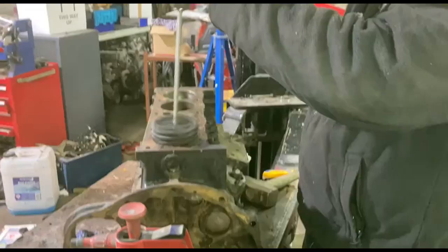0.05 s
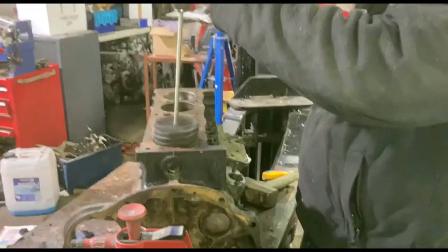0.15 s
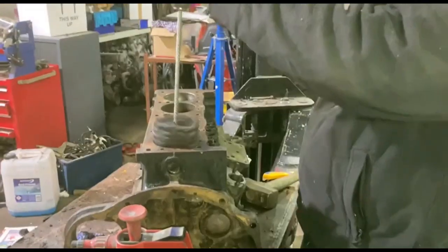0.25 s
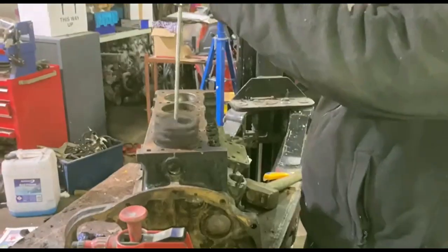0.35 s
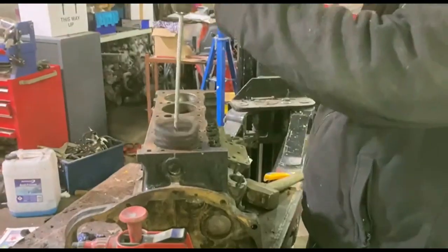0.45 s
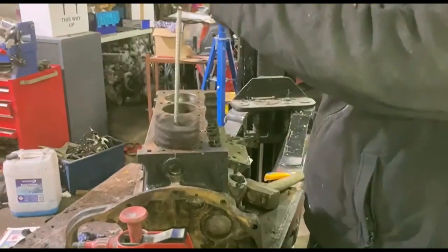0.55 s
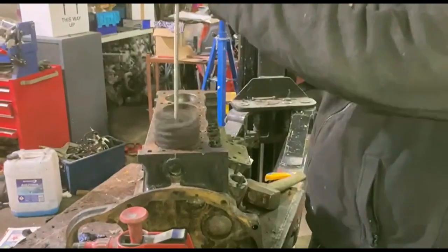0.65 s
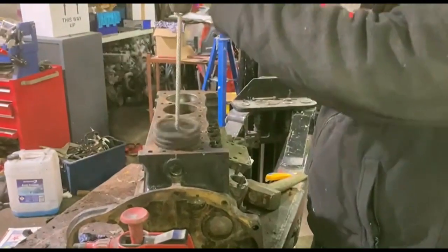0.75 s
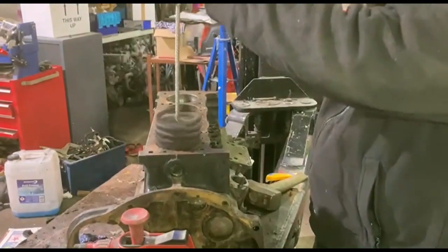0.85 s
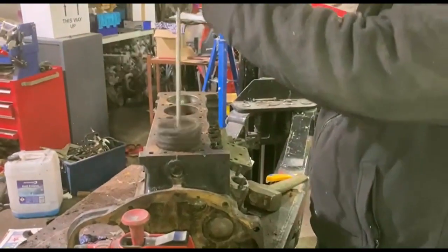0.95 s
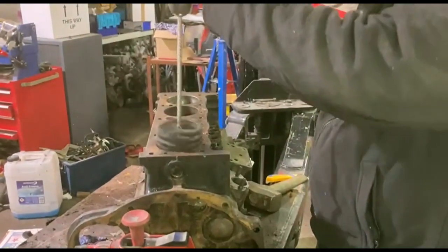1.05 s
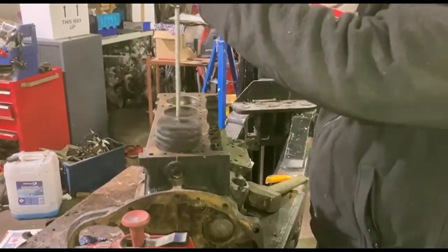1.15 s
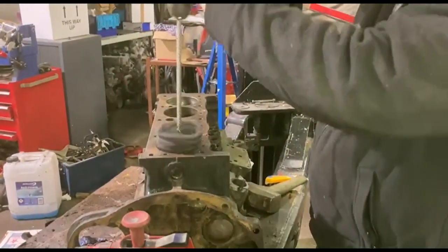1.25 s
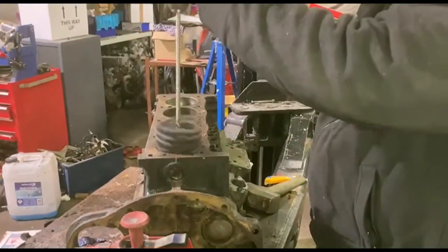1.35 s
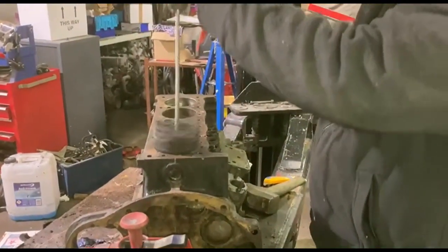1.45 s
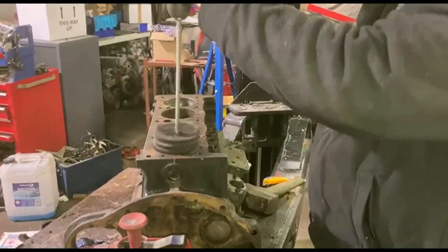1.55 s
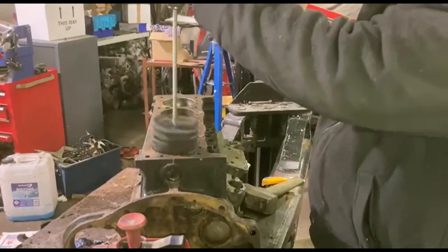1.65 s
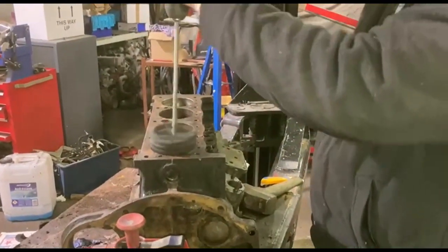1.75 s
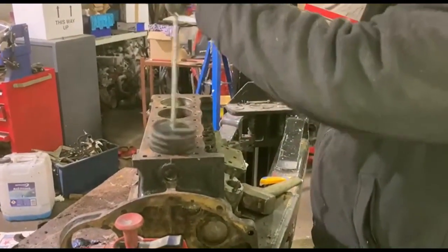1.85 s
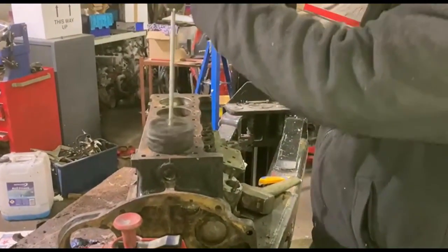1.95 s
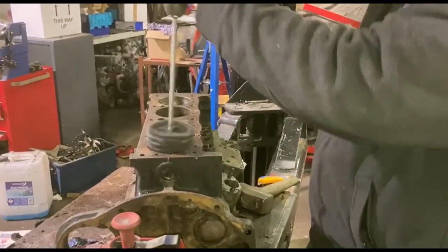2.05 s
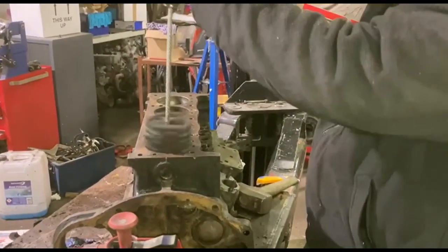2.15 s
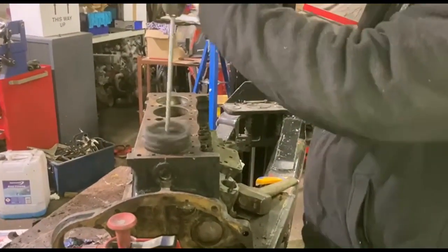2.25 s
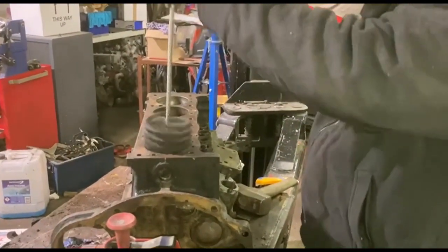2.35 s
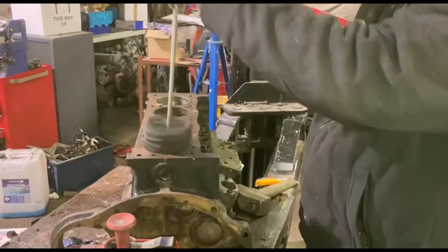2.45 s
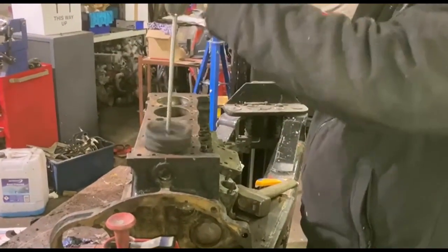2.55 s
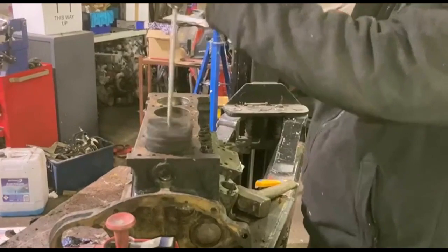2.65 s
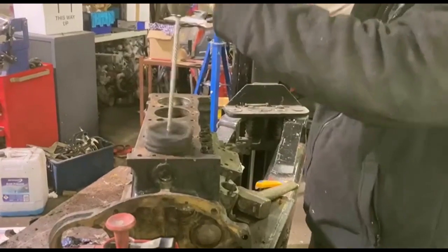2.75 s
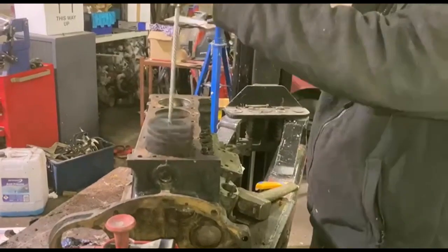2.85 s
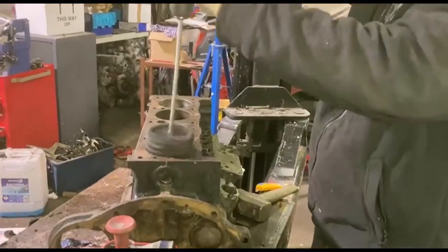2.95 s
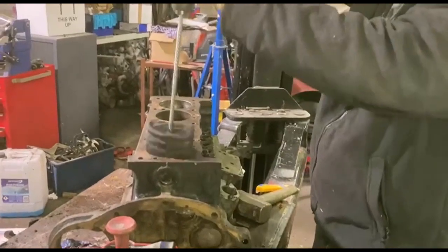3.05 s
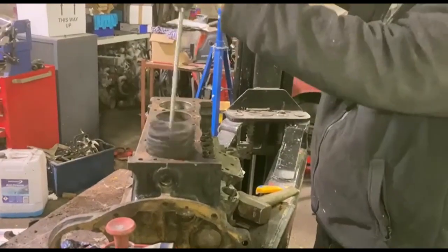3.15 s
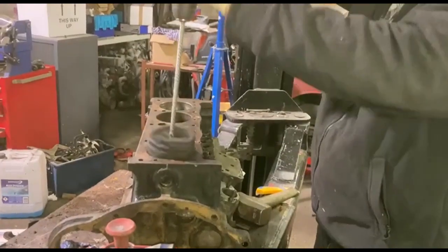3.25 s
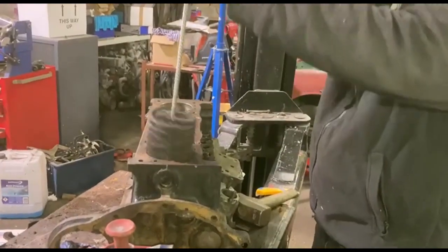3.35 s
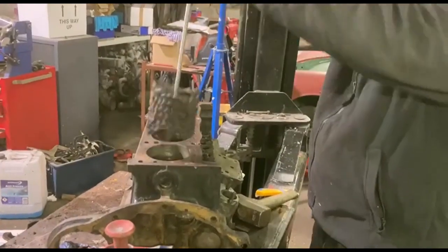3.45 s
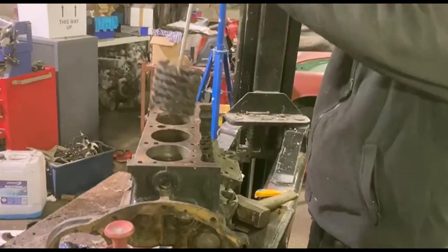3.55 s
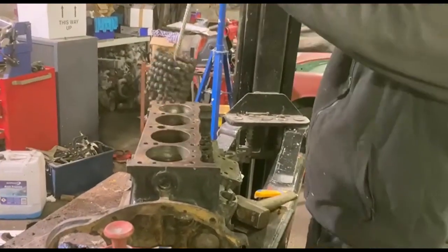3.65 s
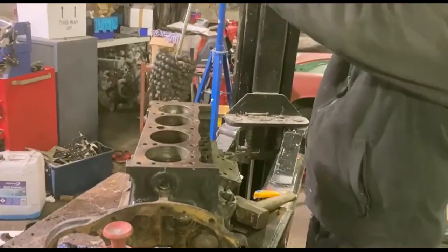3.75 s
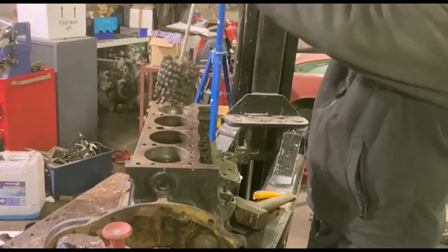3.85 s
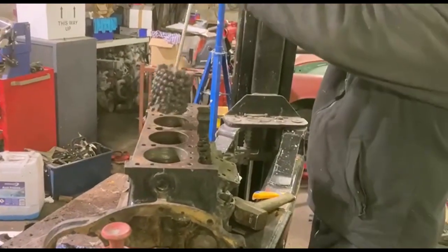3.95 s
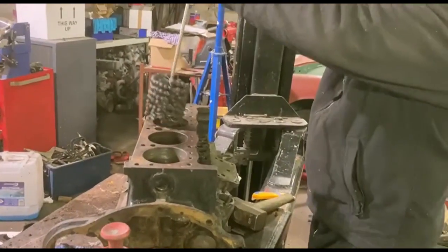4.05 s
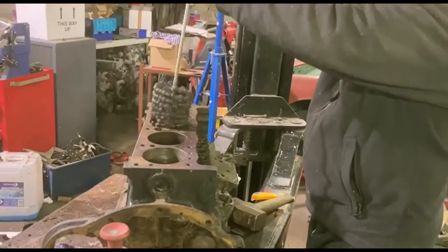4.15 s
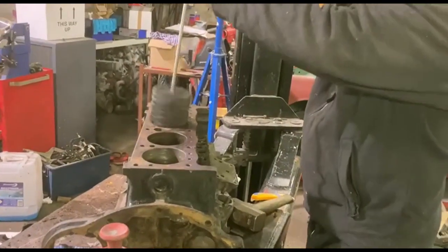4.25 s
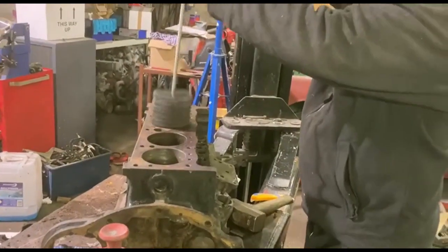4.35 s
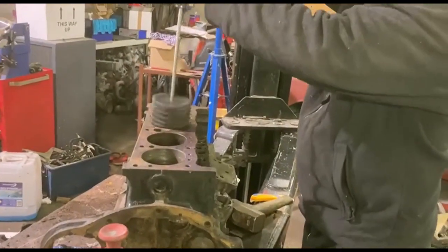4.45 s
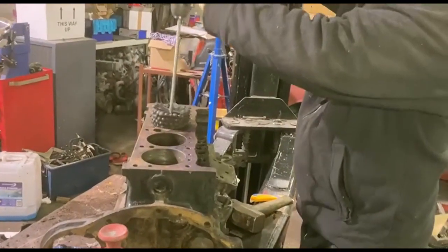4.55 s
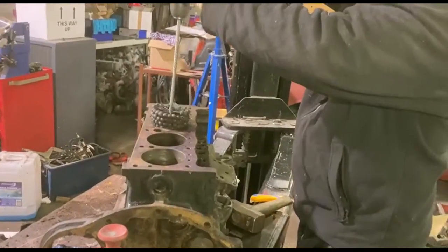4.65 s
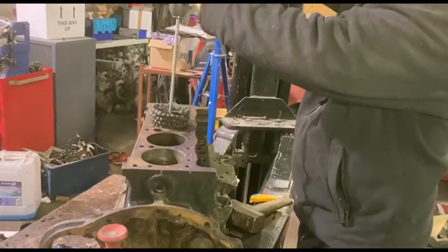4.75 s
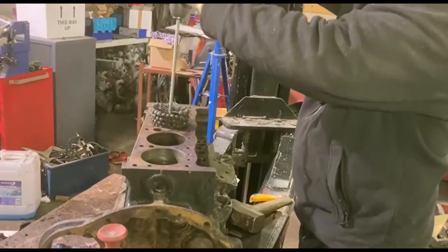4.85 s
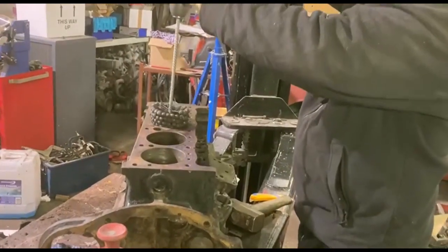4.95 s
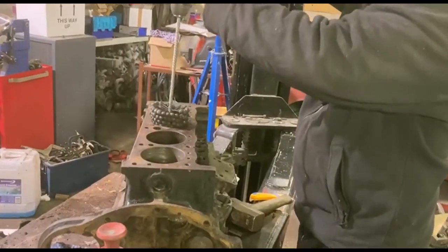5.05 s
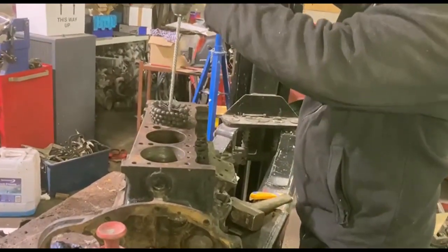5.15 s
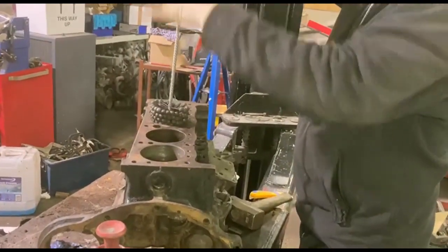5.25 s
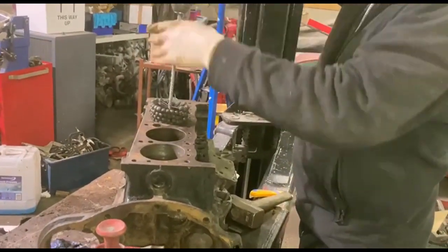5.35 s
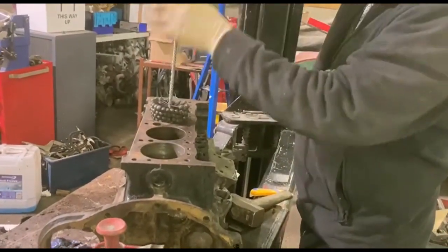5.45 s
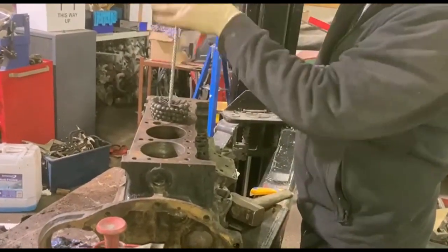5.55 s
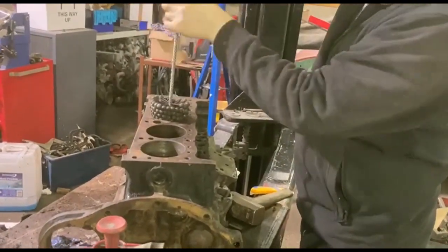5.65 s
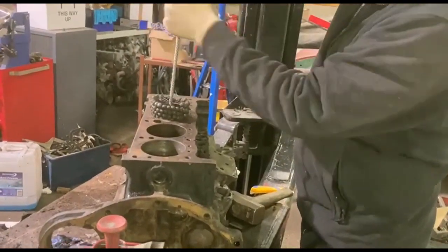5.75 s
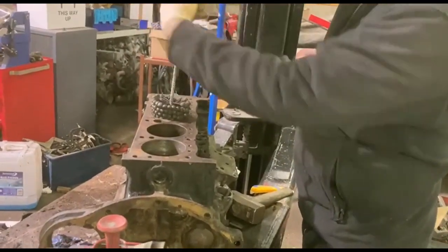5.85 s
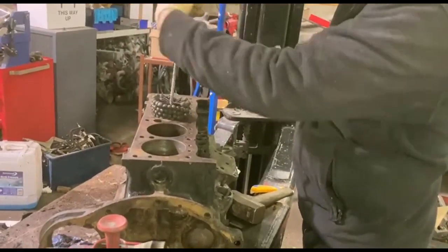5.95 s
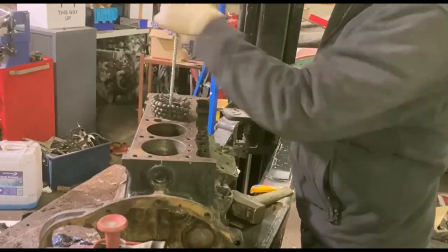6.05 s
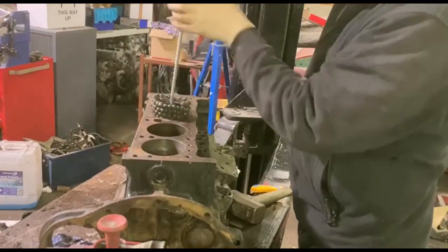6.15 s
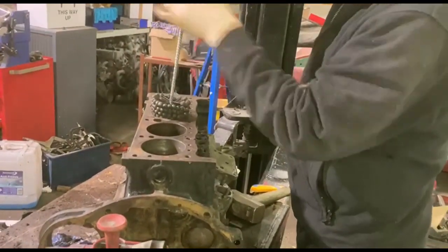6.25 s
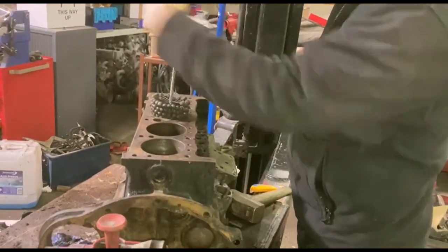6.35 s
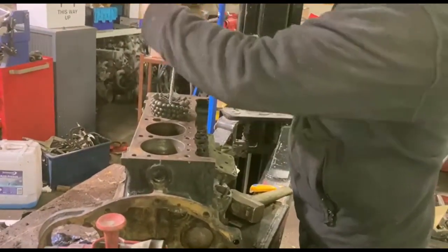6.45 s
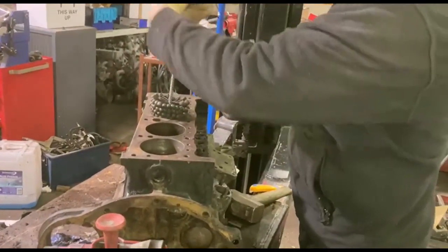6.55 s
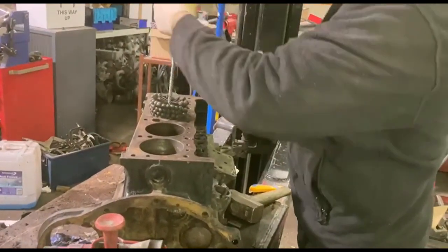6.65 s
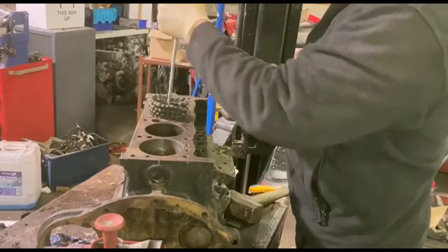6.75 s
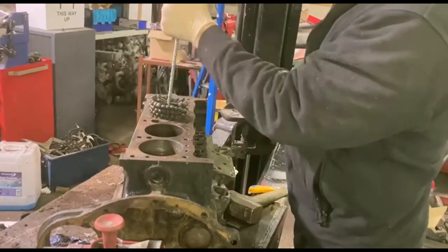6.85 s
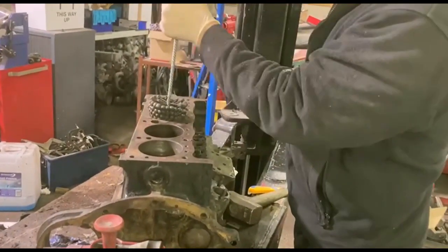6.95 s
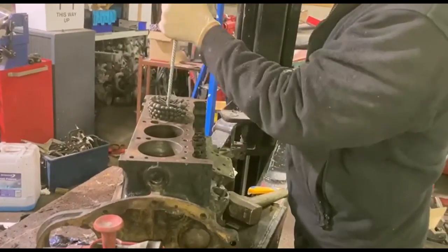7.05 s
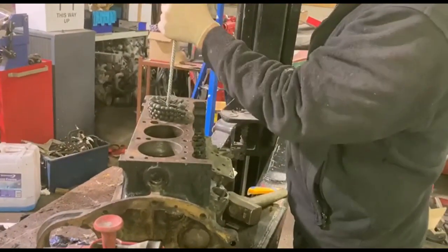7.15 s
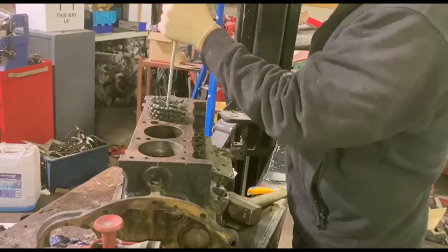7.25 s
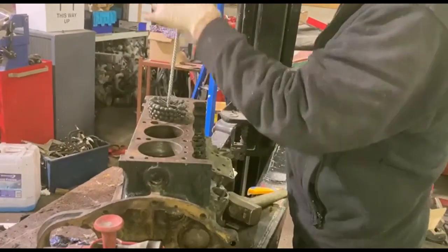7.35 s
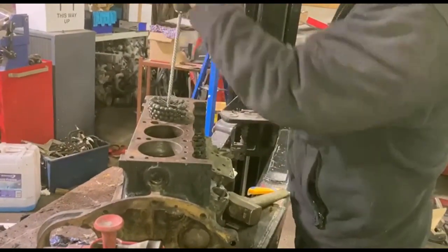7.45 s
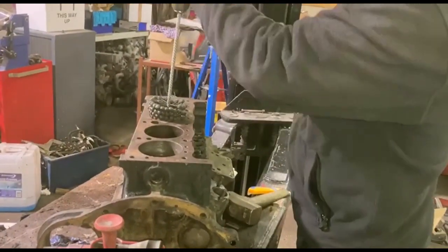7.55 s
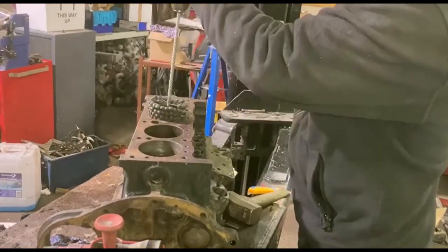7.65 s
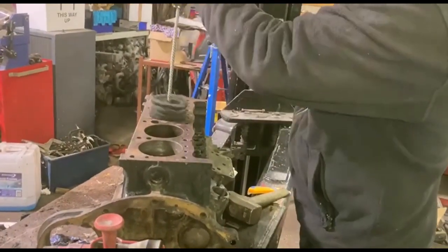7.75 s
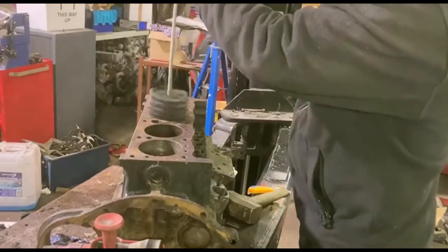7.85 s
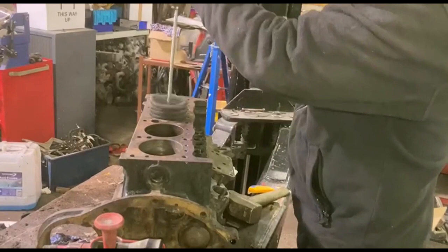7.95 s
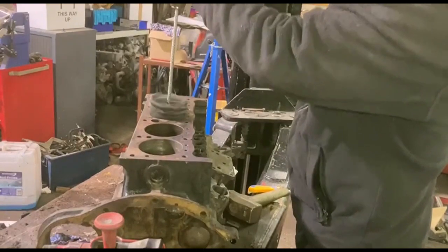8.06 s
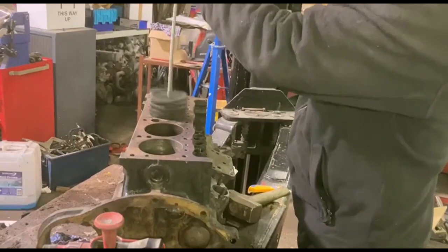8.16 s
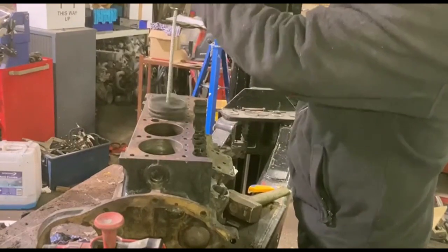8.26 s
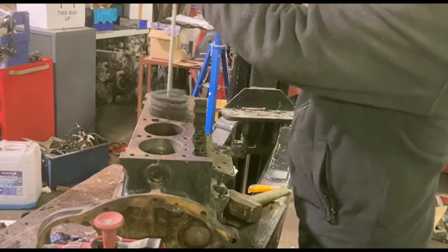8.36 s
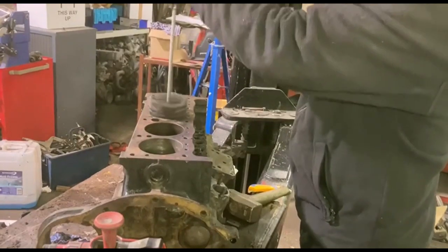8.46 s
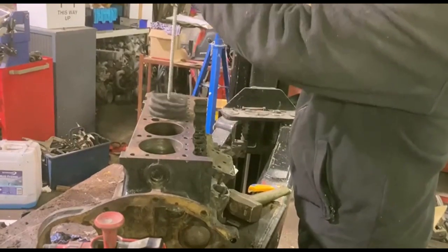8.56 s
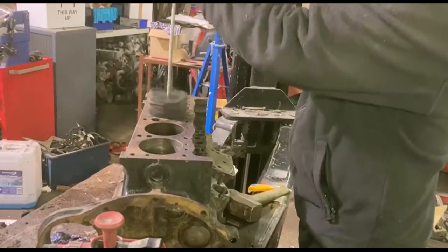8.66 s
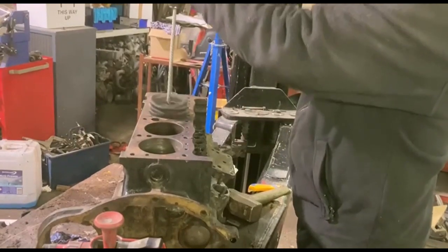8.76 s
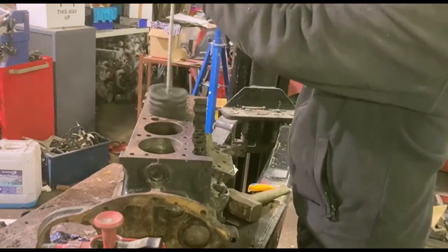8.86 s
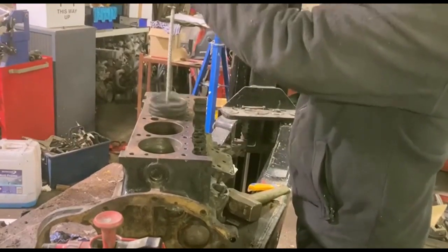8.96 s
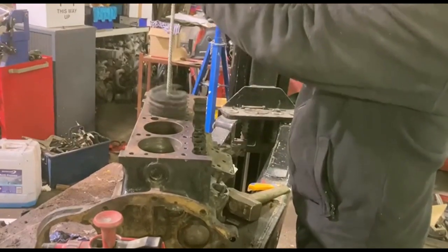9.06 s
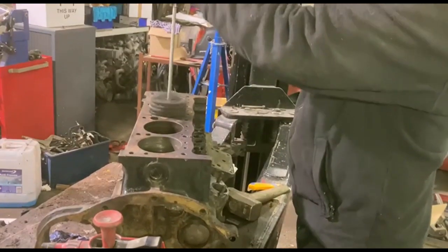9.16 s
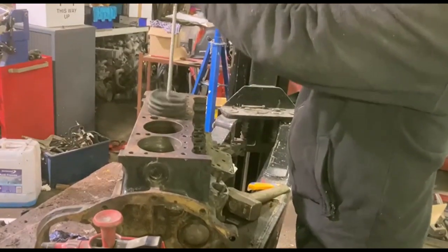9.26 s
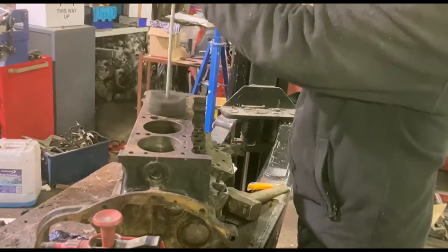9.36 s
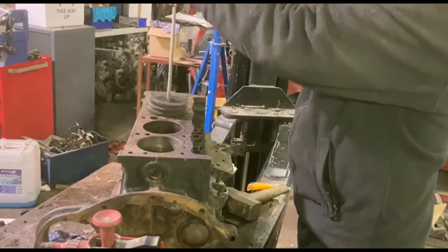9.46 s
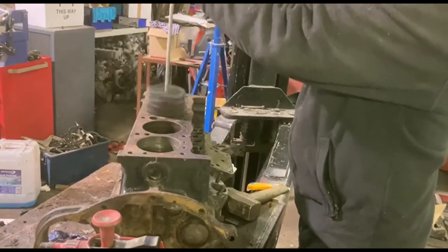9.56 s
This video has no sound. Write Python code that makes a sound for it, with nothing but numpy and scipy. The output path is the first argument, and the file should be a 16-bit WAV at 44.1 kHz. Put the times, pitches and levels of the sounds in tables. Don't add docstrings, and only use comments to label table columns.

```python
import sys
import numpy as np
from scipy import signal
from scipy.fft import rfft, irfft, next_fast_len
from scipy.io import wavfile
from scipy.ndimage import uniform_filter1d

SR = 44100
rng = np.random.default_rng(int(sys.argv[2]) if len(sys.argv) > 2 else 0)


def how_loud(loudness_db):
    steps = np.asarray(loudness_db, float) / 20
    return 10 ** steps


def store_wav(level_fs):
    pcm = np.round(np.clip(np.atleast_2d(level_fs), -1, 1) * 32767)
    wavfile.write(sys.argv[1], SR, pcm.T.astype(np.int16))


N = 423801

# (time [s], level [dB])
RUMBLE_LEVEL = [(0.0, -57), (3.24, -49.5), (3.53, -62.5), (4.4, -54.5), (4.9, -50.5), (5.4, -63.5),
                (6.6, -59), (8.03, -57.5), (8.4, -47), (9.61, -55)]
# (frequency [Hz], level [dB])
RUMBLE_SPECTRUM = [(15, -76), (25, -33.5), (43, -14.5), (81, 5), (153, -9), (199, -13), (403, -10),
                   (436, -26), (600, -40), (780, -14), (1320, -120)]
CLOTH_SPECTRUM = [(300, -16), (500, -16), (1300, -15), (2300, -19), (3500, -25.5), (5000, -27.5),
                  (6500, -28)]
GEAR_SPECTRUM = [(250, -12.5), (450, -13.5), (600, -10), (830, 1), (1200, -5.5), (1500, -2.5), (2200, -1),
                 (2700, -4), (3500, -5), (4200, -10), (5500, -6.5)]
HISS_SPECTRUM = [(3500, -13.5), (4800, -11.5), (5900, -13), (6500, -8), (7300, -1), (9000, -0.5),
                 (10200, 0.5), (11400, -5), (12500, -2.5)]
# (time of the peak [s], rustle [dB], brightness [dB])
RUBS = [(3.5, -52, -6), (4.069, -63, -2), (4.999, -58.5, 0), (5.281, -60.5, -14), (5.541, -73, 14.5),
        (5.749, -59.5, -1), (6.02, -53.5, 6.5), (6.39, -65, 7.5), (6.55, -58, -5), (6.7, -57.5, -5),
        (6.85, -63.5, -4), (7.28, -58, 5.5), (7.47, -66.5, 5), (7.66, -67, 7)]
# (time [s], peak [dB], pitch [Hz], treble [dB])
SMALL_CLICKS = [(4.07, -39.5, 790, 7), (4.095, -50, 1530, 7), (4.134, -33, 773, -9), (5.284, -23, 3430, -3),
                (5.287, -22.5, 3500, -5), (5.291, -28, 3480, -18), (5.3, -35, 3700, 0),
                (5.539, -60.5, 3500, -4), (5.671, -21.5, 895, -24.5), (5.859, -49.5, 2640, 2.5),
                (5.88, -45.5, 2080, 3.5), (6.009, -43.5, 2480, 2), (6.019, -36.5, 910, -0.5),
                (6.417, -42.5, 1570, -8), (6.451, -44, 1120, -9), (6.527, -37.5, 1600, 0),
                (6.555, -39, 2190, 3), (6.566, -36, 1100, -7), (6.629, -31.5, 1030, -12),
                (6.706, -30, 1450, 0), (6.713, -34, 1350, -15), (6.781, -46, 1345, -28),
                (6.856, -27, 1210, -9.5), (6.882, -34, 1297, -12), (7.233, -45, 1110, -18),
                (7.381, -44.5, 1620, -11), (7.455, -48.5, 825, -16), (7.641, -40, 1680, 5),
                (3.579, -44, 5000, 6), (3.625, -42, 2400, -6), (3.7, -54, 1500, -15), (3.723, -52, 1520, -15),
            (3.74, -56, 6000, -5), (3.758, -53, 1500, -15), (3.989, -50, 2520, 0), (6.636, -41, 1100, -8),
            (6.727, -52, 10500, -6), (6.865, -37, 1200, -10), (6.873, -38, 1000, -12)]
# (time [s], peak [dB], pitch [Hz], treble [dB], t60 [s])
BUMPS = [(4.078, -44, 7450, 0, .015), (4.165, -40, 370, -40, .05), (4.542, -34, 290, -40, .066),
         (4.759, -37, 290, -40, .3), (5.068, -43, 340, -40, .12), (5.284, -32, 1650, -30, .035),
         (5.286, -33, 780, -30, .05), (5.672, -30, 3200, -6, .01), (5.69, -43, 1100, -20, .05),
         (5.988, -49, 1610, -12, .06), (6.084, -48, 1450, -15, .06)]
# (time [s], peak [dB], pitch [Hz], treble [dB], t60 [s])
PULL_OUT = [(3.380, -19, 1500, -8, .04), (3.386, -12, 2990, -8, .03), (3.391, -13, 2700, -14, .03),
            (3.398, -13, 2300, -16, .05)]
# (time [s], knock [dB], snap [dB], wall ring [dB], ball tick [dB])
NEAR_KNOCKS = [(0.376, -20, -27, -37.5, -20), (0.679, -17, -24, -49.5, -4), (0.943, -15.5, -26.5, -37, -12),
               (1.19, -16, -26, -24.5, -3), (1.454, -17.5, -33, -35, -13.5), (1.702, -15, -24.5, -23, -4),
               (1.96, -14.5, -27.5, -46.5, -3), (2.201, -18, -30.5, -37.5, -7.5),
               (2.462, -16.5, -26.5, -45, -6.5), (2.671, -17.5, -25, -35, -3.5),
               (2.912, -15.5, -25.5, -45.5, -2), (3.16, -17.5, -27, -45.5, -11)]
FAR_KNOCKS = [(7.934, -36, -36, -8.5, -34), (8.162, -25.5, -27.5, -12.5, -10), (8.388, -19.5, -28, -22, -4),
              (8.615, -18.5, -26.5, -15, -6.5), (8.856, -18.5, -27, -24, -3.5), (9.09, -21, -27, -13.5, -7),
              (9.307, -22.5, -31, -17, -7), (9.544, -25, -33, -16, -9)]
# (pitch [Hz], level [dB], t60 [s])
NEAR_BODY = [(93.6, -3.5, .3), (107, -18.5, 0.33), (160, -0.5, 0.2), (185.3, 5, 0.1), (222.3, -9.5, 0.069),
             (276.8, -12, 0.35), (301, -9, 0.2), (325.7, 1, 0.18)]
FAR_BODY = [(93, 3.5, 0.16), (126.2, -2.5, 0.27), (158, -11.5, 0.19), (194.2, 2.5, 0.14), (245.3, -1, 0.16),
            (271, 0, 0.097), (330.2, 7, 0.091)]
# (pitch [Hz], level [dB], t60 [s])
ROD_SNAP = [(680, -13.5, 0.065), (830, 1.5, 0.017), (1040, -14.5, 0.11), (1284, 3, 0.0046),
            (1698, -10, 0.054)]
# (time before the knock [s], pitch [Hz])
NEAR_TICK = (.0065, 6600)
FAR_TICK = (.0019, 7700)
# (time [s], peak [dB], pitch [Hz])
RIM_TICKS = [(0.272, -14, 11900), (0.47, -8, 8050), (0.5515, -5.5, 10400), (0.8153, -7.5, 11000),
             (0.921, -8, 10400), (1.239, -8, 10600), (1.3356, -9, 9700), (1.442, -2, 10200),
             (1.486, -13, 10400), (1.5915, -8, 10500), (1.786, -13, 10000), (1.8547, -12, 11000),
             (2.1765, -7, 9800), (2.273, -8, 11400), (2.832, -13, 10800), (3.025, -9.5, 10300),
             (3.0892, -4, 9700), (3.2822, -14, 7200), (3.3367, -11, 10200), (3.375, -6.5, 6950),
             (3.581, -54, 9600), (4.1135, -30, 6900), (4.19, -1, 9800), (4.246, -5, 10250),
             (8.278, -2.5, 8340), (8.297, -11, 10600), (8.5102, -3, 8850), (8.535, -9, 7500),
             (8.984, -2, 9800), (9.412, -5, 9940),
             (0.169, -17, 11000), (0.1865, -13, 10480), (0.2513, -16, 10700), (0.3585, -18, 7850),
              (0.4463, -12, 10900), (0.6504, -16, 8060), (1.036, -16.5, 11300), (1.0629, -16, 10900),
              (1.1692, -15.5, 6580), (1.5543, -10, 11350), (2.1006, -15, 10260), (2.1405, -14.5, 11040),
              (2.4129, -16.5, 10400), (2.7022, -14, 10330), (2.7686, -7, 10070), (3.0684, -12, 7470),
              (3.1796, -22, 11150), (3.3043, -11, 10670), (3.3552, -10, 10570),
             (4.1374, -25, 10600), (4.1459, -23, 10000), (4.1766, -12, 10400), (4.3203, -18, 10200),
              (4.4, -15, 10560), (7.7776, -16, 9840), (7.91, -22, 10400), (8.1447, -16, 8030),
              (8.3623, -16, 7120), (8.4949, -13, 10900), (8.774, -16.5, 11500), (8.823, -18, 7420),
              (9.064, -19, 10400), (9.185, -21, 7010), (9.2038, -18, 7200), (9.2482, -13, 11000),
              (9.2791, -15, 7560), (9.4448, -14, 10400)]
# (time [s], hone hiss [dB], gear noise [dB])
RUNS = [
    [(0.03, -34.5, -38), (1.3, -35.5, -39), (2.09, -35.5, -38.5), (2.3, -33, -36.5), (2.9, -33, -36.5),
     (3.37, -35, -39), (3.4, -35.5, -22.5), (3.45, -62, -45), (3.62, -70, -55.5)],
    [(4.02, -107, -61.5), (4.068, -63, -69), (4.126, -57, -42), (4.144, -36.5, -42.5), (4.45, -42, -38.5),
     (4.93, -43, -38.5), (4.99, -66, -54.5), (5.12, -88, -77)],
    [(7.655, -65, -54), (7.671, -47.5, -43.5), (7.709, -41, -41.5), (8.14, -37, -40.5), (9.05, -37, -41),
     (9.14, -36, -38.5), (9.61, -34, -40)],
]
# (time [s], mesh pitch [Hz], mesh [dB], whine [dB])
GEAR_TONES = [
    [(0.03, 830, -52, -49), (2.15, 830, -83, -53), (2.25, 609.2, -51, -42), (2.45, 613.4, -43.5, -44.5),
     (2.75, 619.7, -45, -45), (2.95, 620, -47.5, -44.5), (3.36, 628, -57.5, -46), (3.45, 598.4, -53, -75)],
    [(4.1, 703.8, -72, -61), (4.17, 783.3, -33, -36), (4.22, 706, -48, -94.5), (4.4, 698.4, -49.5, -90),
     (4.5, 685, -35.5, -88), (4.68, 687, -48, -70), (4.84, 680, -38, -63), (4.95, 680, -56, -74),
     (5.02, 642, -62, -81)],
    [(7.66, 556.5, -67, -61), (7.735, 717, -34.5, -33), (7.79, 793, -34.5, -53), (7.85, 811, -44.5, -52),
     (7.9, 830, -51.5, -41), (9.05, 832, -46, -45), (9.12, 575, -45.5, -40), (9.3, 623.6, -44.5, -36),
     (9.48, 626, -46.5, -39.5), (9.61, 586, -43, -41)],
]
# (start [s], end [s])
STRAINED = [
    (2.198, 3.5),
    (9.082, 9.7),
]
# (time [s], length [s], pitch [Hz], level [dB])
SQUEALS = [(2.33, .05, 2700, -34), (2.49, .07, 2660, -31), (2.71, .09, 2645, -27), (3.09, .11, 2160, -34),
           (3.17, .04, 2860, -35), (3.24, .06, 2600, -34), (9.14, .05, 2540, -35), (9.2, .05, 2400, -37),
           (9.29, .06, 2740, -37), (9.38, .07, 2620, -36), (9.49, .06, 2820, -36), (9.57, .05, 2500, -38)]
# (time [s], extra hiss [dB])
SURGES = [(0.08, 0.5), (0.81, 2), (1.47, 1.5), (1.85, 1.5), (2.3, 2), (3.29, 8.5), (4.242, 12), (4.411, 6),
          (8.283, -0.5), (8.993, 4)]
# (frequency [Hz], level [dB])
SCATTER = [(60, -19.5), (600, -5.5), (1600, 2), (1950, -3.5), (2300, 4.5), (4000, 8.5), (4800, -1),
           (5350, -6.5), (6200, -0.5), (9000, -6.5), (12000, -6.5)]
# (frequency [Hz], level [dB])
LEFT_LOUDER = [(300, -0.5), (1500, 0.5), (3000, 3.5), (5300, 5.5), (6000, 6), (7500, -2.5), (12000, 0)]
# (frequency [Hz], lead [half turns])
LEFT_LEADS = [(0, 0), (1600, .22), (1950, 1), (2600, 2), (3500, 2.6), (3900, 3.4), (4650, 3.4), (5350, 3),
              (5750, 2.88), (6400, 2.15), (7100, 2), (8500, 1.1), (9600, .88), (11100, 0)]
HANDS_DIRECT_DB = [
    [0],
    [-5],
]


def in_time(tables, silent=-120):
    t = np.arange(N) / SR
    out = np.full((len(tables[0][0]) - 1, N), float(silent))
    for rows in tables:
        s, *columns = np.transpose(rows)
        inside = (t >= s[0]) & (t <= s[-1])
        out[:, inside] = [np.interp(t[inside], s, column) for column in columns]
    return out


def at_hz(points, hz):
    table_hz, value = np.transpose(points)
    return np.interp(np.log(hz + 1), np.log(table_hz), value)


def rms_one(x):
    return x / np.sqrt(np.mean(x ** 2) + 1e-20)


def drift(rate):
    knots = rng.standard_normal(N // 20 + 3002)
    r = np.exp(-40 * np.pi * rate / SR)
    smooth = signal.lfilter([1], [1, -2 * r, r * r], knots)[3000:]
    return np.interp(np.arange(N) / 20, np.arange(N // 20 + 2), rms_one(smooth))


def band_filter(x, order, hz, kind):
    return signal.sosfilt(signal.butter(order, hz, kind, fs=SR, output="sos"), x)


def coloured(x, spectrum):
    hz = np.fft.rfftfreq(N, 1 / SR)
    inside = (hz > spectrum[0][0] * .7) & (hz < spectrum[-1][0] * 1.2)
    return rms_one(irfft(rfft(x) * how_loud(at_hz(spectrum, hz)) * inside, N))


def ring(taps, hz, t60):
    r, w = how_loud(-60 / (t60 * SR)), 2 * np.pi * hz / SR
    return signal.lfilter([0, np.sin(w)], [1, -2 * r * np.cos(w), r * r], taps + 1e-18)


def spikes(times, db):
    out = np.zeros(N)
    np.add.at(out, np.round(np.asarray(times) * SR).astype(int), how_loud(db))
    return out


def swells(times, heights, rise_s, fall_s):
    t = np.arange(0, N, 32) / SR
    tents = sum(np.interp(t, [s - rise_s, s, s + fall_s], [0, top, 0]) for s, top in zip(times, heights))
    return np.interp(np.arange(N) / SR, t, tents)


def rumble():
    level_db = in_time([RUMBLE_LEVEL])[0] + 3.0 * drift(7.5)
    return how_loud(level_db) * coloured(rng.standard_normal(N), RUMBLE_SPECTRUM)


def rustle():
    rise_db_per_s, fade_db_per_s, bright_fade_db_per_s = 471, 93, 45
    t = np.arange(0, N, 64) / SR
    level, treble = how_loud(-71.5), 0
    for s, rub_db, bright_db in RUBS:
        rub = how_loud(rub_db - np.maximum(rise_db_per_s * (s - t), fade_db_per_s * (t - s)))
        level = level + rub
        treble = treble + rub * how_loud(bright_db - bright_fade_db_per_s * np.maximum(t - s, 0))
    level, treble = (np.interp(np.arange(N) / SR, t, curve) for curve in (level, treble))
    dull = coloured(rng.standard_normal(N), CLOTH_SPECTRUM) * how_loud(3.5 * drift(30))
    bright = coloured(rng.standard_normal(N), HISS_SPECTRUM) * how_loud(1.6 * drift(27))
    return level * dull + treble * bright


def clicks():
    rise_s, click_t60_s = .0014, 0.013
    tail_db, tail_t60_s = -18, 0.11
    out, t = np.zeros(N), np.arange(4000) / SR
    rise = np.minimum(t / rise_s, 1)
    short = [(*row, click_t60_s) for row in SMALL_CLICKS]
    for s, peak_db, hz, treble_db, t60 in short + BUMPS + PULL_OUT:
        noise, at = rng.standard_normal((2, len(t))), round(s * SR)
        fade = how_loud(-60 * t / max(t60, .003)) * rise
        after = how_loud(tail_db - 60 * t / tail_t60_s) * rise
        band_hz = [max(hz * 0.64, hz - 350), min(hz * 1.3, hz + 560)]
        body = band_filter(noise[0] * (fade + after), 2, band_hz, "band")
        crack = band_filter(noise[1] * fade ** 2, 1, [5000, 9000], "band")
        burst = body / np.abs(body).max() + how_loud(treble_db) * crack / np.abs(crack).max()
        out[at:at + len(t)] += how_loud(peak_db) * burst
    collar = spikes([5.286], [-41])
    return out + sum(ring(collar, hz, .3) for hz in (3330, 3450, 3540, 3660, 3790))


def thumps(s, knock_db, body):
    detune, rebound_s, rebound_db = .03, .038, -11
    shake_db, shake_t60_s = -5.5, .22
    out, t = np.zeros(N + SR), np.arange(SR // 2) / SR
    hz, db, t60 = np.transpose(body)[:, :, None]
    shake_fade = np.minimum(t / 0.025, 1) * how_loud(shake_db - 60 * t / shake_t60_s)
    chances = rng.standard_normal((len(s), 5, len(body), 1))
    for start, level_db, chance in zip(s, knock_db, chances):
        decay = how_loud(-60 * t / (t60 * how_loud(1.5 * chance[1])))
        tone = np.sin(2 * np.pi * hz * (1 + detune * chance[0]) * t) * decay
        shake = rms_one(band_filter(rng.standard_normal(len(t)), 2, [70, 380], "band")) * shake_fade
        blow = np.sum(how_loud(db + 1.6 * chance[2]) * tone, axis=0) + shake
        rebound = np.sum(how_loud(db + 4.0 * chance[3]) * tone, axis=0)
        at = round(start * SR)
        again = round((start + rebound_s * (1 + .08 * chance[4, 0, 0])) * SR)
        out[at:at + len(t)] += how_loud(level_db - 7.5) * blow
        out[again:again + len(t)] += how_loud(level_db - 9.0 + rebound_db) * rebound
    return out[:N]


def knocks(table, body, lead_s):
    s, knock_db, snap_db, wall_db, _ = np.transpose(table)
    s = s - lead_s
    boom = thumps(s, knock_db, body)
    snap = np.zeros(N)
    for hz, db, t60 in ROD_SNAP:
        snap += ring(spikes(s, snap_db + db + 10.5 + rng.normal(0, 2, len(s))), hz, t60)
    wall = ring(spikes(s, wall_db - 8), 385, 0.032)
    hz = np.fft.rfftfreq(N, 1 / SR)
    bending = .135
    turns = bending * (2 * np.sqrt(hz) - hz / np.sqrt(6500))
    swept = irfft(-rfft(boom + snap + wall) * np.exp(-2j * np.pi * turns), N)
    return band_filter(swept, 4, 70, "high")


def ball_ticks():
    out, t = np.zeros(N), np.arange(300) / SR
    ends = []
    for table, (lead_s, hz) in ((NEAR_KNOCKS, NEAR_TICK), (FAR_KNOCKS, FAR_TICK)):
        ends += [(row[0] - lead_s, row[4], hz) for row in table]
    twins = 0.45 * np.sin(2 * np.pi * 11000 * t) + 0.49 * np.sin(2 * np.pi * 9000 * t)
    fade = np.minimum(t / .0002, 1) * how_loud(-60 * t / 0.0033)
    for s, peak_db, hz in RIM_TICKS + ends:
        at = round(s * SR)
        out[at:at + len(t)] += how_loud(peak_db + 2.5) * (np.sin(2 * np.pi * hz * t) + twins) * fade
    return out


def drill_levels():
    hiss_db, gear_db = in_time(RUNS)
    ends = [row[0] for row in NEAR_KNOCKS + FAR_KNOCKS]
    jam = swells(ends, np.ones(len(ends)), rise_s=0.034, fall_s=0.072)
    surge_db = swells(*np.transpose(SURGES), rise_s=.07, fall_s=0.091)
    return hiss_db + 2.5 * jam + surge_db, gear_db + 3 * jam + 0.23 * surge_db


def gear_noise():
    sizes = how_loud(6.5 * np.minimum(rng.exponential(1, N), 3)) * rng.choice([-1, 1], N)
    happens = rng.random(N) < 1500 / SR * how_loud(4.0 * drift(25))
    grit = rms_one(band_filter(rms_one(sizes * happens), 1, 900, "high"))
    whole = coloured(0.46 * grit + rng.standard_normal(N), GEAR_SPECTRUM)
    low = band_filter(whole, 2, 2400, "low")
    lower = band_filter(whole, 2, 1000, "low")
    return rms_one(sum(part * how_loud(0.5 * drift(16)) for part in (whole - low, low - lower, lower)))


def rough_tone(hz, level, rough, wobble):
    phase = 2 * np.pi * np.cumsum(hz * (1 + wobble * drift(13))) / SR
    broken = how_loud(2.5 * drift(12))
    in_step = (1 + .6 * drift(rough)) * np.sin(phase)
    return level * broken * (in_step + 1.2 * drift(rough) * np.cos(phase))


def squeals():
    t = np.arange(N) / SR
    s, length, hz, db = np.transpose(SQUEALS)
    nearest = np.searchsorted((s[1:] + s[:-1]) / 2, t)
    level = how_loud(db[nearest]) * np.exp(-((t - s[nearest]) / length[nearest] * 2) ** 2)
    phase = 2 * np.pi * np.cumsum(hz[nearest] * (1 + .004 * drift(15))) / SR
    return level * how_loud(2 * drift(30)) * np.sin(phase)


def gearbox(gear_db):
    grind = how_loud(gear_db + 5.0 + 1.2 * drift(8.6)) * gear_noise()
    mesh_hz, mesh_db, whine_db = in_time(GEAR_TONES)
    t = np.arange(N) / SR
    strained = sum((t > start) & (t < end) for start, end in STRAINED) > 0
    whine_hz = mesh_hz * np.where(strained, 4.33, 2.3)
    mesh = rough_tone(mesh_hz, how_loud(mesh_db), rough=22, wobble=.008)
    whine = rough_tone(whine_hz, how_loud(whine_db), rough=90, wobble=.04)
    return grind + mesh + whine + squeals()


def hone(hiss_db):
    sizes = how_loud(11.0 * np.minimum(rng.exponential(1, N), 5)) * rng.choice([-1, 1], N)
    happens = rng.random(N) < 5000 / SR * how_loud(3.0 * drift(40))
    grains = rms_one(sizes * happens)
    scratch = coloured(0.48 * grains + rng.standard_normal(N), HISS_SPECTRUM)
    return how_loud(hiss_db + 9.0 + 2.0 * drift(25)) * scratch


def two_microphones(x, hands):
    shop_t60_s, bench_t60_s, shop_db = 0.38, 0.027, -14.5
    size = next_fast_len(N + SR)
    hz, t = np.fft.rfftfreq(size, 1 / SR), np.arange(SR // 2) / SR
    fade = how_loud(-60 * t / bench_t60_s) + how_loud(shop_db - 60 * t / shop_t60_s)
    shares = how_loud([9 * drift(6) for place in range(5)])
    shares /= np.sqrt(np.sum(shares ** 2, axis=0))
    tails = rng.standard_normal((5, 2, len(t))) * fade * np.minimum(t / 0.0012, 1)
    tails /= np.sqrt(np.sum(fade ** 2))
    scattering = x + how_loud(-2.5) * hands
    scatter_db = at_hz(SCATTER, hz)
    diffuse = sum(rfft(scattering * share, size) * rfft(tail, size) for share, tail in zip(shares, tails))
    diffuse = diffuse * how_loud(scatter_db)
    lead = np.exp(.5j * np.pi * np.interp(hz, *np.transpose(LEFT_LEADS)) * [[1], [-1]])
    level = how_loud(at_hz(LEFT_LOUDER, hz) * [[.5], [-.5]]) / np.sqrt(1 + how_loud(2 * scatter_db))
    both = irfft((rfft(x, size) * lead + diffuse) * level, size)[:, :N]
    return both + how_loud(np.array(HANDS_DIRECT_DB)) * hands


def scene():
    hiss_db, gear_db = drill_levels()
    background = rumble() + rustle()
    blows = knocks(NEAR_KNOCKS, NEAR_BODY, 0.0051) + knocks(FAR_KNOCKS, FAR_BODY, 0.0016)
    drill = ball_ticks() + gearbox(gear_db) + hone(hiss_db)
    return two_microphones(background + blows + drill, clicks())


def thin_stereo(x, under_db, hole_db):
    hz, _, z = signal.stft([x[0] + x[1], x[0] - x[1]], SR, nperseg=1024)
    patches = np.add.reduceat(np.abs(z) ** 2, np.arange(0, len(hz), 8), axis=1)
    patches = uniform_filter1d(patches, size=3, axis=2)
    whim_db = 8.0 * uniform_filter1d(rng.standard_normal(patches.shape), size=5, axis=2)
    weak = patches < patches[::-1] * how_loud(2 * (under_db + whim_db))
    dropped = np.repeat(weak, 8, axis=1)[:, :len(hz)] & (hz > 1700)[:, None]
    thinned = z * np.where(dropped, how_loud(hole_db), 1)
    mid, side = signal.istft(thinned, SR, nperseg=1024)[1][:, :N]
    return np.array([mid + side, mid - side]) / 2


def low_pass(x):
    return signal.sosfilt(signal.butter(12, 13020, fs=SR, output="sos"), x)


def record(dry):
    start_s, edge_hz = .0265, 11662
    cut = signal.sosfilt(signal.ellip(10, .5, 56, edge_hz, fs=SR, output="sos"), dry)
    thinned = thin_stereo(cut, under_db=-6.6, hole_db=-34)
    mix = thinned * (np.arange(N) > start_s * SR)
    return low_pass(mix)


dry = scene()
out = record(dry)
store_wav(out)
```